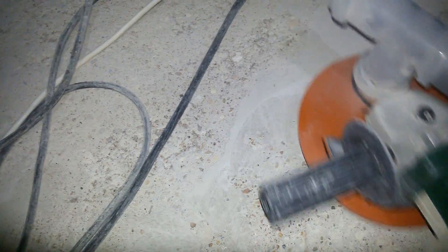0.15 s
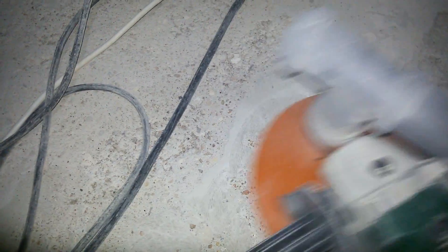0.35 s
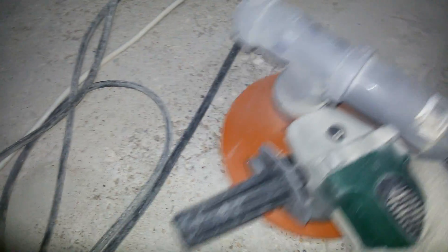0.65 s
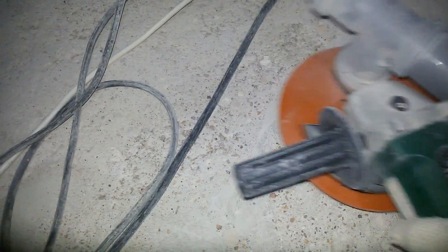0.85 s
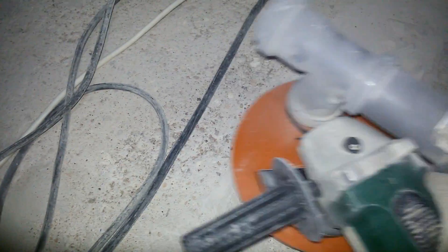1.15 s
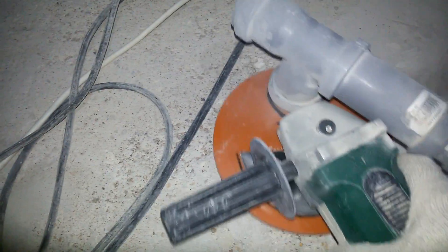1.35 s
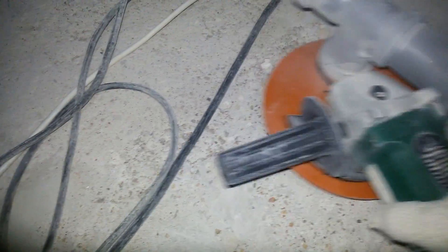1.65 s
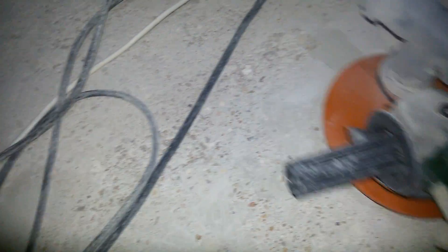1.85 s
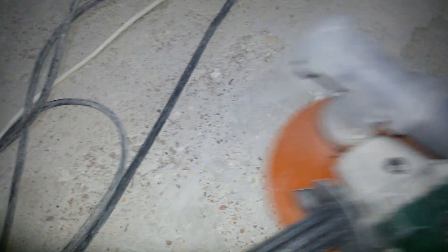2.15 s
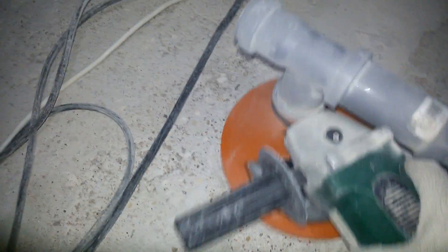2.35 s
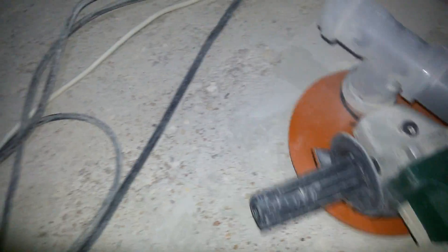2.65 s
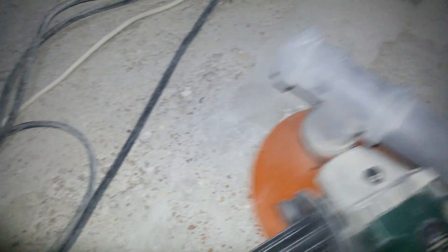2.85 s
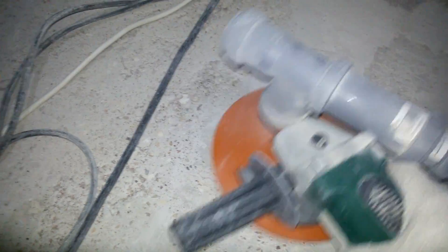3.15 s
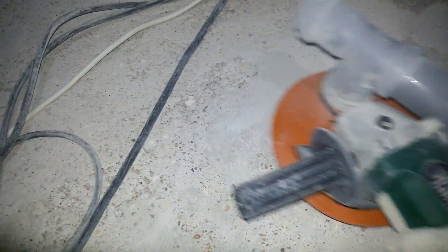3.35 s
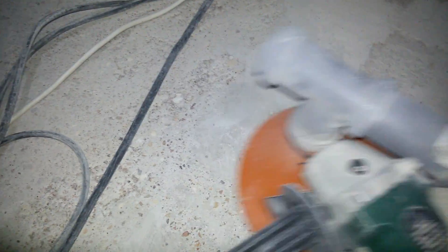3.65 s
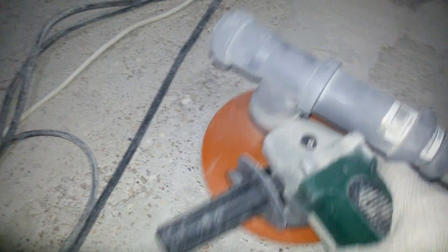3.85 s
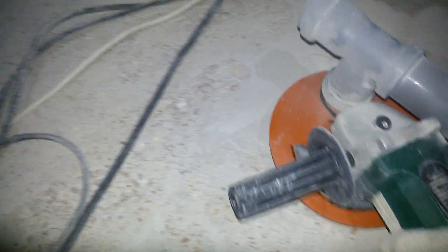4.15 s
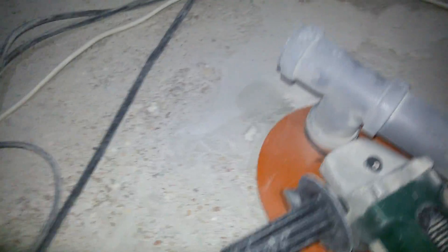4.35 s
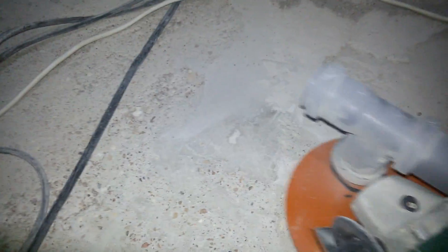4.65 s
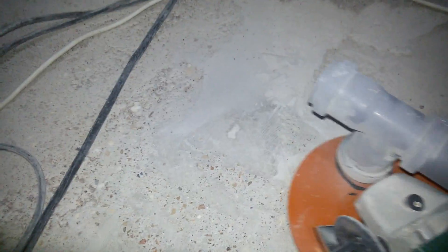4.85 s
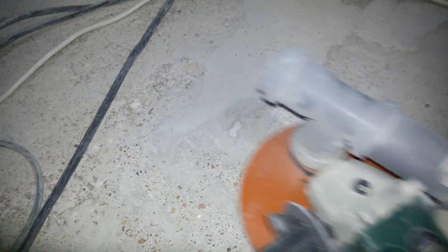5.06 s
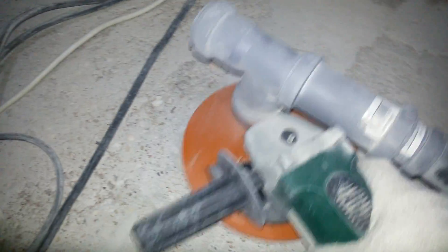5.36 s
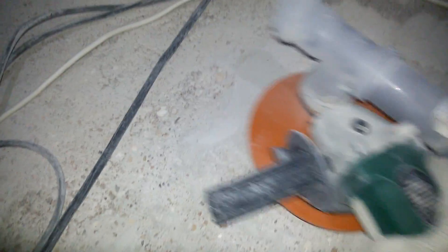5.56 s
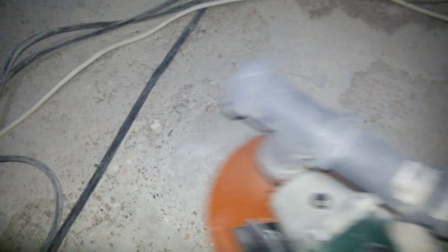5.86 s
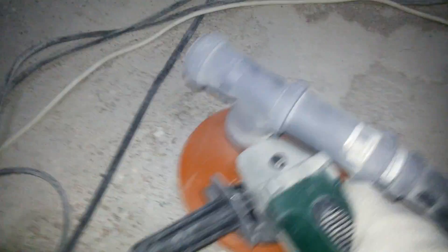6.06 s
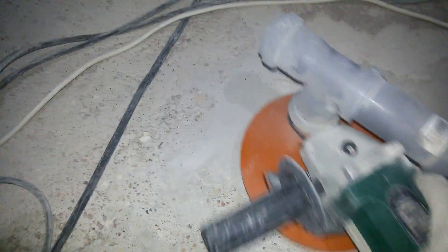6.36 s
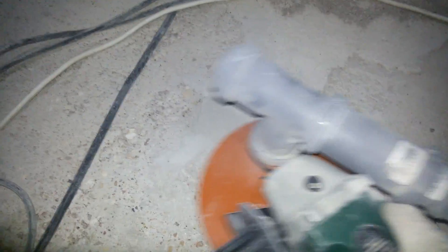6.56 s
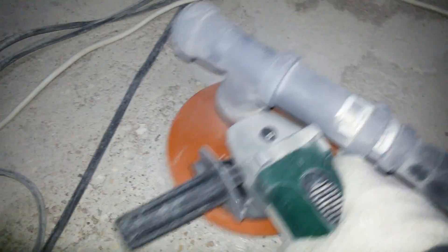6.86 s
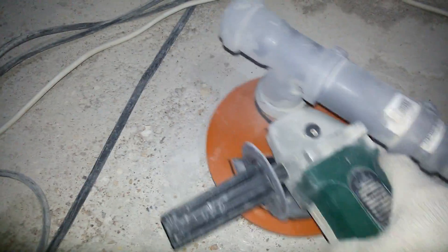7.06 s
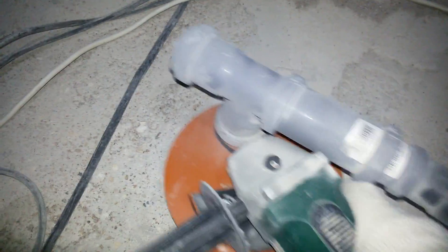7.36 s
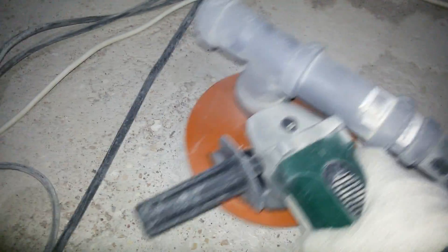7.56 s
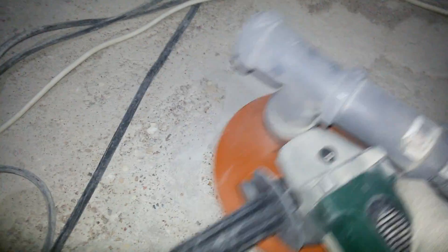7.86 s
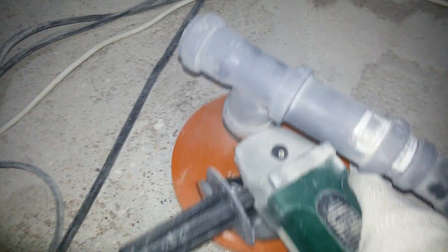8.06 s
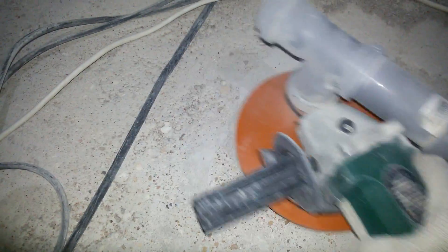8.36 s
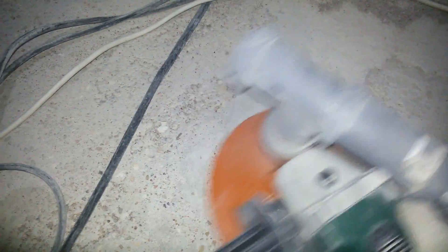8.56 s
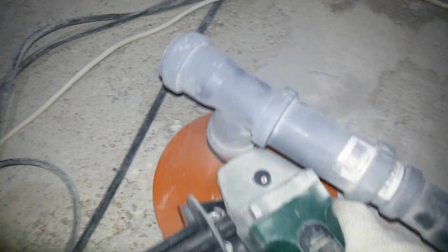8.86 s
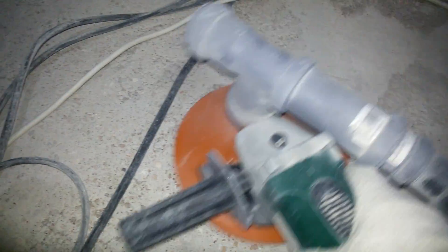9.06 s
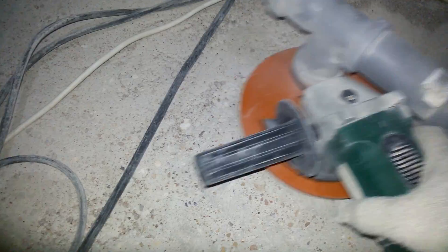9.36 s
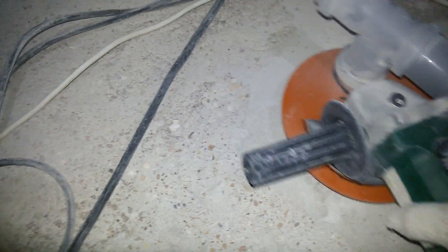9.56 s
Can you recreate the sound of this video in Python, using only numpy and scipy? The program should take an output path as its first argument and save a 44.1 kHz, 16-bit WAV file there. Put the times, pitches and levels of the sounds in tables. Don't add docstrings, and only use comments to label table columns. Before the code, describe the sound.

An angle grinder is already running at full tilt, grinding a concrete floor in sweeps. Its high gear whine dips and rises slightly with hand pressure, roughened by a fast electrical buzz. Grit rattles in the shroud, the cup wheel hisses and rings in short metallic flashes. A dust extractor whines steadily behind. Close single microphone indoors, loud, slightly overloaded, thin in the bass, never stopping.

```python
import sys
import numpy as np
from scipy import signal
from scipy.fft import rfft, irfft, next_fast_len
from scipy.io import wavfile
from scipy.ndimage import uniform_filter1d

SR = 44100
rng = np.random.default_rng(int(sys.argv[2]) if len(sys.argv) > 2 else 0)


def boost_factor(decibels):
    exponent = np.asarray(decibels, float) / 20
    return 10 ** exponent


def wav_out(sig):
    wavfile.write(sys.argv[1], SR, np.round(np.clip(np.atleast_2d(sig).T, -1, 1) * 32767).astype(np.int16))


N = 428652
TIME = np.arange(N) / SR

RIPPLE_HZ = 100.04
PINION, CROWN = 11, 34
FREE_TURNS, LOADED_TURNS = 368, 335
MESH_REST_DB = -20
HISS_DB, HISS_FREE_DB, TOP_DB = -17.5, 2.5, -36.5
TRACK_SHARE = .3
HOP, MEMORY_TOP_HZ = 941, 14460

# time in seconds, armature turns per second.
SPEED = [(0.0, 320.6), (0.19, 319.7), (0.93, 330.8), (2.22, 325.6), (2.96, 329.7), (3.85, 319.3),
         (4.52, 323.4), (5.28, 349.4), (6.04, 331.1), (6.84, 324.9), (7.31, 321.4), (8.08, 322.7),
         (8.52, 324.7), (9.72, 324.5)]
# centre in seconds, half length in seconds, turns per second gained.
EASINGS = [(0.63, 0.15, 4.9), (1.35, 0.19, 8.6), (1.69, 0.15, 5.8), (2.59, 0.21, 9.3), (3.4, 0.22, 11.8),
           (3.71, 0.13, 4.8), (4.13, 0.22, 12.1), (5.1, 0.33, 22.5), (5.61, 0.15, 15.0), (5.87, 0.14, 8.6),
           (6.29, 0.26, 13.8), (6.98, 0.11, 4.3), (7.5, 0.07, 1.4), (7.7, 0.09, 2.2), (8.11, 0.09, 3.1),
           (8.33, 0.2, 5.9), (8.85, 0.18, 8.7), (9.29, 0.25, 6.1)]
# centre in seconds, half length in seconds, turns per second.
TREMORS = [(0.17, 0.06, -0.4), (0.37, 0.06, 0.5), (1.35, 0.04, 0.3), (1.64, 0.2, 0.2), (2.33, 0.06, -0.4),
           (2.53, 0.06, 0.4), (3.27, 0.06, 0.7), (3.72, 0.14, -0.5), (4.0, 0.09, 0.5), (4.21, 0.06, 0.4),
           (4.37, 0.09, -0.7), (4.57, 0.04, -0.3), (4.86, 0.14, 0.5), (5.19, 0.06, 1.0), (5.39, 0.09, -0.5),
           (5.59, 0.06, -0.2), (5.72, 0.06, 0.3), (5.8, 0.3, -0.4), (6.04, 0.09, -0.4), (6.25, 0.06, 0.5),
           (6.45, 0.09, -0.5), (6.61, 0.06, 0.3), (6.78, 0.04, -0.8), (6.9, 0.04, 0.4), (8.08, 0.06, 0.5),
           (8.25, 0.04, -0.3), (8.66, 0.06, -0.2), (8.66, 0.3, 0.2), (9.15, 0.09, 0.2), (9.64, 0.14, -0.2)]
# armature turns per second, mesh overtone level in dB.
CASE = [(321.4, -28.5), (329.7, -33.5), (332, -34.5), (346.4, -35.5), (371, -28)]
# centre in seconds, half length in seconds, dB over rest.
SINGS = [(0.25, 0.17, 5), (0.94, 0.049, -18), (2.13, 0.22, 6), (2.53, 0.097, -15), (2.86, 0.12, 4.5),
         (3.1, 0.067, -18), (3.43, 0.06, 1), (3.68, 0.075, 6.5), (3.88, 0.096, 0), (4.21, 0.055, -10.0),
         (4.61, 0.22, 6), (4.98, 0.05, -8), (5.39, 0.087, 6), (5.68, 0.096, -2), (6.04, 0.049, -7.5),
         (6.53, 0.2, -1.5), (6.94, 0.1, 3.5), (6.22, 0.11, 4.5), (7.23, 0.077, -5), (7.51, 0.14, 4),
         (7.92, 0.066, -9.5), (8.08, 0.065, 4), (8.45, 0.06, -7), (8.64, 0.061, -7), (9.44, 0.09, -3),
         (9.15, 0.095, 2.5)]
# ripple beats away, wheel turns away, rest level in dB.
FRINGE = [(-3, 0, -35), (-1, -2, -37), (-2, 0, -27), (-1, -1, -31.5), (-1, 0, -24.8), (0, -1, -34),
          (0, 1, -35), (1, 0, -27), (2, 0, -29.5), (1, 1, -31), (3, 0, -35), (2, 1, -31), (3, 1, -33),
          (4, 1, -36)]
# centre in seconds, half length in seconds, change in dB.
TILT_FAR_BELOW = [(0.25, 0.057, 4.5), (1.06, 0.076, 8.5), (1.51, 0.12, -7), (1.96, 0.14, 2.5),
                  (2.74, 0.11, 5), (3.51, 0.23, 8), (4.0, 0.081, -13), (4.33, 0.16, 5), (4.57, 0.16, -10),
                  (4.66, 0.37, 12.5), (5.15, 0.09, -13), (5.39, 0.3, -12), (5.8, 0.09, 8.5),
                  (6.41, 0.044, 1), (6.94, 0.14, 8), (7.15, 0.051, -8), (7.35, 0.056, -2),
                  (7.59, 0.039, 11), (7.8, 0.09, -5), (8.13, 0.35, -0.5), (9.39, 0.021, 7),
                  (9.68, 0.053, 5)]
TILT_BELOW = [(0.37, 0.075, -6), (1.1, 0.27, 1), (1.72, 0.1, 6.5), (2.25, 0.075, -12.5), (2.7, 0.28, 6.5),
              (3.51, 0.27, 3.5), (3.8, 0.11, -12), (4.21, 0.081, 10), (4.41, 0.082, -14),
              (4.66, 0.082, 3.5), (4.9, 0.073, 3), (5.43, 0.09, -15), (6.17, 0.03, 0), (6.17, 0.37, -4),
              (6.29, 0.029, -6), (6.53, 0.14, 5.5), (6.98, 0.27, -1.5), (7.64, 0.21, -18),
              (8.17, 0.12, 4.5), (8.57, 0.064, -10), (8.7, 0.062, 6), (9.64, 0.083, -6)]
TILT_ABOVE = [(0.21, 0.24, 3), (0.7, 0.13, -4.5), (1.27, 0.29, -14.5), (1.88, 0.3, 3), (2.82, 0.082, -9),
              (4.41, 0.1, 6.5), (5.1, 0.092, 6), (5.43, 0.25, -15), (5.68, 0.16, 10), (5.96, 0.2, -7.5),
              (6.41, 0.064, -1), (6.86, 0.25, -15.5), (7.1, 0.16, 15), (7.47, 0.16, -9.5),
              (7.8, 0.083, 3.5), (8.21, 0.052, -7), (8.57, 0.1, 4), (8.82, 0.036, -9.0), (8.94, 0.036, 3),
              (8.98, 0.11, -17), (9.19, 0.04, -6), (9.55, 0.18, 7.5)]
TILT_FAR_ABOVE = [(0.7, 0.037, -9), (1.08, 0.2, -10.5), (1.43, 0.084, -6), (1.59, 0.17, 5),
                  (1.96, 0.094, -18), (2.25, 0.06, 7.5), (2.66, 0.055, -12), (2.86, 0.051, -22),
                  (3.27, 0.052, 3), (3.84, 0.065, -17), (4.0, 0.065, 4.5), (4.82, 0.38, -13),
                  (5.35, 0.19, 8), (5.88, 0.14, -19), (6.13, 0.075, 10.5), (6.29, 0.025, -8),
                  (6.66, 0.043, 0.5), (6.9, 0.16, 1), (7.27, 0.066, 2), (7.59, 0.085, 4), (8.21, 0.098, 9),
                  (8.41, 0.031, -5), (9.1, 0.29, 7.5)]
OVERTONE_FRINGE_DB = [-12, -7.5, -6, -5, -8, -8, -14]
# multiple of armature speed, level in dB, ripple sidebands relative in dB.
ORDERS_DB = [
    (1, -48.5, -20),
    (2, -49, -20),
    (10, -35, 0),
    (12, -30.5, -5),
    (15, -35, -8),
    (18, -37, -3),
    (21, -45, 1),
    (23, -42, -1),
    (33, -52, 0),
]
# frequency in Hz, density in dB per Hz.
RATTLE = [(310, -41.5), (520, -5.5), (533, -22.5), (553, -21), (608, -7.5), (927, 1.5), (1080, -7.5),
          (1400, 3.5), (1670, -7), (2150, -11.5), (2300, -14), (2990, -57), (5060, -120)]
# time in seconds, rattle level in dB.
LOOSE = [(0, -24), (1, -22.5), (2.1, -23.5), (4.5, -25), (4.9, -22), (5.2, -26), (5.55, -25), (5.8, -22),
         (6.15, -27), (6.8, -19), (7.1, -22.5), (7.6, -22.5), (8.2, -21), (8.85, -24.5), (9.3, -21),
         (9.72, -23)]
# centre in seconds, half length in seconds, change in dB.
BUMPS = [
    (.05, 0.073, 5.5),
    (1.0, 0.027, 3.5),
    (2.54, 0.086, 1),
    (4.55, 0.044, 4.5),
    (6.85, 0.099, -3.5),
]
# frequency in Hz, density in dB per Hz.
HISS = [(1180, -22), (2000, -15.5), (2160, -17.5), (2310, -14.5), (2490, -11), (3150, -5.5), (3650, -3),
        (4250, -3), (5390, -6), (5900, -12), (7590, -14.5), (8700, -32.5), (9400, -29), (12200, -53.5),
        (20700, -120)]
# centre in seconds, half length in seconds, hiss change in dB.
BITES = [(0.24, 0.089, -2.5), (.7, 0.076, 0), (1.05, 0.16, -1.5), (4.4, .12, 0), (11, 0.14, -1.5),
         (1.2, 0.26, 1.3), (2.06, 0.17, -0.5), (5.8, 0.11, 1.5), (7.7, 0.51, 0), (8.2, 0.58, 0.3),
         (4.9, 0.28, -0.5), (5.6, 0.13, 0.5), (6.7, .15, -1.5), (4.3, .15, -0.5)]
# upper edge in Hz, beat in dB, lag in radians, double beat in dB,
# change running free in dB.
RASP = [
    (2600, .9, -1.2, 0, 0),
    (3400, 3.2, 3.0, .6, 0),
    (4300, 1.6, 2.9, .6, 0),
    (4750, 2.3, .2, 2, 0),
    (5150, 1.6, -2, 1.9, 0),
    (6100, .9, -2.0, 0, -1.5),
    (7600, 2.2, -2.7, 1.4, -4),
    (22050, 1.8, -1.6, 1.5, 0),
]
# frequency in Hz, density in dB per Hz.
TOP = [(7000, -12), (8200, -1), (8800, -4), (9400, -11), (10700, -5), (12100, -7.5), (13300, -9),
       (13900, -13), (14500, -10.5)]
# frequency in Hz, width in Hz.
RING_MODES = [
    (2358, 30),
    (5540, 55),
    (6300, 39),
]
RING_REST_DB = [-41, -31, -39]
# centre in seconds, half length in seconds, rise in dB.
LOW_FLARES = [(0.09, 0.091, 5), (0.7, 0.33, 11), (1.03, 0.098, 5.7), (1.3, 0.28, 3.3), (1.75, 0.17, 6.1),
              (2.23, 0.089, 3.8), (2.51, 0.042, 11), (2.88, 0.14, 7.2), (3.27, 0.13, 5.2),
              (3.54, 0.044, 15), (3.91, 0.11, 3.5), (4.25, 0.061, 8.7), (4.47, 0.18, 10.4),
              (5.05, 0.27, 7.3), (5.8, 0.23, 13), (6.17, 0.025, 7.2), (6.34, 0.09, 4.9), (6.55, 0.079, 12),
              (7.18, 0.029, 6), (8.04, 0.073, 8), (9.03, 0.046, 6), (9.09, 0.2, 6.2)]
MIDDLE_FLARES = [(0.33, 0.031, 5), (0.531, 0.12, 14), (0.711, 0.021, 8.6), (1.32, 0.2, 9.5),
                 (1.82, 0.059, 5.6), (2.07, 0.033, 6.9), (2.23, 0.2, 6.4), (2.43, 0.02, 8),
                 (2.83, 0.016, 11), (3.11, 0.075, 14.3), (3.62, 0.048, 3.3), (3.84, 0.024, 14),
                 (4.36, 0.028, 6.6), (4.54, 0.14, 12), (4.77, 0.032, 4.7), (4.96, 0.022, 3.3),
                 (5.19, 0.15, 3), (5.81, 0.015, 7), (6.0, 0.13, 3.4), (6.04, 0.023, 6.6), (6.28, 0.026, 11),
                 (6.62, 0.065, 11), (6.81, 0.073, 3.4), (7.38, 0.17, 9.8), (8.01, 0.04, 6),
                 (8.23, 0.17, 1.8), (8.76, 0.028, 5.5), (9.15, 0.049, 3.8)]
HIGH_FLARES = [(0.31, 0.027, 9.2), (0.48, 0.24, 5.8), (1.07, 0.061, 11), (1.74, 0.04, 4), (2.0, 0.018, 4),
               (2.3, 0.025, 6.3), (2.37, 0.24, 2.7), (2.53, 0.025, 5), (2.97, 0.021, 4.2),
               (3.13, 0.22, 6.8), (3.47, 0.04, 4), (3.88, 0.028, 6.9), (4.62, 0.09, 4), (4.83, 0.11, 3.9),
               (6.04, 0.037, 7.3), (6.35, 0.16, 4.7), (6.98, 0.022, 5.6), (7.57, 0.14, 5.6),
               (8.289, 0.058, 13), (9.1, 0.13, 8.8)]
# centre in seconds, half length in seconds, change in dB.
CASE_HUMS = [
    (4.92, 0.28, 10.5),
    (2.05, 0.13, 4),
    (8.08, 0.068, 5.5),
    (2.4, 0.25, 6.5),
    (6, 0.13, -2.5),
]
# centre in seconds, half length in seconds, change in dB.
HOPS = [(.769, .005, -4), (2.57, 0.006, -4), (3.78, .01, -4.5), (4.428, .005, -5), (4.627, .005, -4),
        (4.846, 0.005, -3), (5.253, 0.004, -3), (5.32, 0.006, -10), (5.378, .004, -2.5), (5.45, 0.008, -3),
        (5.568, 0.006, -6), (5.924, 0.005, -6), (6.33, 0.008, -2.5), (6.677, .005, -4), (8.107, .004, -5),
        (8.125, .004, -4), (8.156, .003, -4), (9.617, .005, -4)]
# time in seconds, rotor turns per second.
ROTOR = [(0, 498.8), (1.5, 499.3), (4.7, 499), (5.6, 500.5), (7.3, 498.8), (9.72, 499.3)]
# time in seconds, level in dB.
ROTOR_DB = [(0.0, -33), (1.78, -27.5), (1.95, -31.5), (2.43, -28.5), (3.71, -29.5), (4.14, -28.5),
            (4.52, -33), (5.55, -27.5), (9.04, -28.5), (9.12, -26), (9.67, -28), (9.72, -36.5)]
# centre in seconds, half length in seconds, rise in dB.
BLADES_CLEAR = [
    (1.15, .45, 9),
    (1.85, .3, 5),
    (3.9, .55, 6.5),
    (5.5, .3, 8),
    (6.1, .4, 9.5),
    (7.1, .2, 7),
    (8.1, .5, 5),
]
# frequency in Hz, density in dB per Hz.
ROAR = [(140, -43.5), (200, -5.5), (260, -3.5), (330, -0.5), (450, -4), (600, 2), (900, 2), (1500, 0)]
# frequency in Hz, rounding step over the usual line size in dB.
THRIFT = [(150, 19), (200, 14), (255, 8), (300, 0), (500, -2), (2000, -2), (7000, -4), (8500, 3),
          (9400, 11), (10500, 9), (12000, 10), (12950, 11.5), (13250, 10), (13600, 14.5), (14400, 13.5)]


def rms_one(x):
    return x / np.sqrt(np.mean(x ** 2) + 1e-20)


def in_time(rows):
    s, *columns = np.transpose(rows)
    return [np.interp(TIME, s, c) for c in columns]


def swells(rows):
    coarse = TIME[::64]
    total = sum(height * np.exp(-((coarse - s) / half) ** 2) for s, half, height in rows)
    return np.interp(TIME, coarse, total)


def drift(rate):
    r = np.exp(-2 * np.pi * rate * 40 / SR)
    noise = rng.standard_normal(N // 40 + 2002)
    slow = signal.lfilter([1], [1, -2 * r, r * r], noise)[2000:]
    return np.interp(np.arange(N) / 40, np.arange(len(slow)), rms_one(slow - slow.mean()))


def tone(phase, level_db, fade_db, wander):
    level = boost_factor(level_db + fade_db * drift(7.8))
    return np.sqrt(2) * level * np.sin(phase + wander * drift(7.8))


def coloured(x, points):
    size = next_fast_len(N)
    hz = np.maximum(np.arange(size // 2 + 1) * SR / size, 1)
    hz_at, level_db = np.transpose(points)
    gain = boost_factor(np.interp(np.log(hz), np.log(hz_at), level_db, left=-90, right=-90))
    return rms_one(irfft(rfft(x, size) * gain, size)[:N])


def patchy(points, patchy_db, rate, count):
    x = coloured(rng.standard_normal(N), points)
    edges = np.geomspace(points[0][0], points[-1][0], count + 1)
    spectrum, hz = rfft(x), np.arange(N // 2 + 1) * SR / N
    bands = (irfft(spectrum * ((hz >= a) & (hz < b)), N) for a, b in zip(edges, edges[1:]))
    return sum(band * boost_factor(patchy_db * drift(rate)) for band in bands)


def resonance(hz, width_hz):
    r = np.exp(-np.pi * width_hz / SR)
    poles = [1, -2 * r * np.cos(2 * np.pi * hz / SR), r * r]
    return rms_one(signal.lfilter([1, 0, -1], poles, rng.standard_normal(N)))


def gear(armature, ripple, spindle, overtone_db):
    mesh = PINION * armature + .4 * drift(5)
    out = tone(mesh, MESH_REST_DB + swells(SINGS), fade_db=.5, wander=.3)
    tilts = {-2: swells(TILT_FAR_BELOW), -1: swells(TILT_BELOW),
             1: swells(TILT_ABOVE), 2: swells(TILT_FAR_ABOVE)}
    for beats, turns, rest_db in FRINGE:
        away = beats + turns
        turned = 1.9 * (away in (-1, -3)) + (.6 - .3 * away) * (abs(away) == 2)
        loose = 1 + 2 * abs(turns)
        level_db = rest_db + tilts[np.clip(away, -2, 2)] * (1 if abs(away) < 3 else .6)
        phase = mesh + beats * ripple + turns * spindle + turned
        out += tone(phase, level_db, fade_db=.8 * loose, wander=.28 * loose)
    for beats, step_db in enumerate(OVERTONE_FRINGE_DB, -3):
        wobble = spindle - ripple if abs(beats) == 2 else 0
        phase = 2 * mesh + beats * (ripple + 2.7) + wobble * np.sign(beats)
        out += tone(phase, overtone_db + step_db + 1.5, fade_db=2.5, wander=.5)
    return out


def armature_orders(armature, ripple):
    out = 0
    for multiple, level_db, side_db in ORDERS_DB:
        beat = np.cos(ripple + 2 * drift(1)) + .7 * np.cos(2 * ripple + 2 * drift(1))
        pulse = 1 + boost_factor(side_db) * 2 * beat
        out = out + pulse * tone(multiple * armature, level_db, fade_db=2.2, wander=.4)
    return out


def spindle_hum(spindle, ripple):
    out = tone(spindle + ripple, -53.0, fade_db=1.0, wander=0.86)
    return out + tone(spindle + 3 * ripple, -50.5, fade_db=4.5, wander=.5)


def throb(load, ripple, spindle, mains_db, double_db, spindle_db, sum_db, lag):
    beat_db = mains_db * np.cos(ripple - lag) + double_db * np.cos(2 * (ripple - lag))
    beat_db += spindle_db * np.cos(spindle) + sum_db * np.cos(spindle + ripple - lag)
    gain = boost_factor(load * boost_factor(.8 * drift(3.5)) * beat_db)
    return gain / np.sqrt(uniform_filter1d(gain ** 2, size=4410))


def backlash(knocks):
    count = int(2 * RIPPLE_HZ * N / SR)
    late, sign, size = rng.standard_normal((count, 3)).T
    at = ((np.arange(count) + .2) / (2 * RIPPLE_HZ) + .0004 * late) * SR
    at = np.clip(at.astype(int), 0, N - 1)
    clicks = np.zeros(N)
    clicks[at] = np.sign(sign) * knocks[at] ** .9 * boost_factor(.6 * size)
    return coloured(clicks, RATTLE)


def wheel_track(spindle):
    turn = spindle / (2 * np.pi)
    grit = rng.standard_normal((int(turn[-1]) + 22, 400))
    patterns = signal.lfilter([1], [1, -.85], grit, axis=0)[20:]
    return patterns[turn.astype(int), (turn % 1 * 400).astype(int)]


def rasping(hiss, load, ripple, spindle, patchy_db):
    spectrum, hz, low, out = rfft(hiss), np.arange(N // 2 + 1) * SR / N, 0, 0
    depth = load * boost_factor(.8 * drift(3.5))
    shared_db = .9 * np.cos(spindle) + 1.5 * np.cos(spindle + ripple - .6) + .6 * drift(60)
    double = np.cos(2 * ripple - .8)
    for high, beat_db, lag, double_db, free_db in RASP:
        beat = depth * (beat_db * np.cos(ripple - lag) + double_db * double + shared_db)
        beat = beat + free_db * (1 - load)
        band = irfft(spectrum * ((hz >= low) & (hz < high)), N)
        out = out + band * boost_factor(beat + patchy_db * drift(19))
        low = high
    return out


def band_pass(x, low_hz, high_hz):
    return signal.sosfiltfilt(signal.butter(2, [low_hz, high_hz], "band", fs=SR, output="sos"), x)


def contact(load, ripple, spindle):
    bumps_db = swells(BUMPS)
    rattle_db, top_db = in_time(LOOSE)[0] + bumps_db, TOP_DB + 0.43 * bumps_db
    hiss_db = HISS_DB + HISS_FREE_DB * (1 - load) + swells(BITES)
    knocks = throb(load, ripple, spindle, 4.8, 1.2, 2.4, 1.2, lag=.55)
    rasp = throb(load, ripple, spindle, .8, 1.1, .8, 1.2, lag=-.2)
    shake = drift(12)

    rattle = patchy(RATTLE, patchy_db=0.3, rate=7, count=4) * knocks ** .65
    rattle = (.74 * rattle + .66 * backlash(knocks)) * boost_factor(1.25 * shake)

    repeated = np.sqrt(TRACK_SHARE) * rms_one(wheel_track(spindle))
    grit = repeated + np.sqrt(1 - TRACK_SHARE) * rng.standard_normal(N)
    hiss = coloured(grit, HISS) * boost_factor(0.61 * shake)
    hiss = rasping(hiss, load, ripple, spindle, patchy_db=.7)
    hiss = hiss - .62 * (1 - load) * band_pass(hiss, 2300, 3450)

    top = patchy(TOP, patchy_db=0.94, rate=9.5, count=3) * rasp
    top = top + 0.8 * (1 - load) * band_pass(top, 11400, 13200)
    return boost_factor(rattle_db - 0.7) * rattle + boost_factor(hiss_db + 4.0) * hiss + boost_factor(top_db + 7.5) * top


def wheel(ripple):
    out = boost_factor(-27.5) * resonance(3530, width_hz=77) * boost_factor(2.0 * drift(3) + swells(CASE_HUMS))
    all_flares = (LOW_FLARES, MIDDLE_FLARES, HIGH_FLARES)
    for (hz, width_hz), rest_db, flares in zip(RING_MODES, RING_REST_DB, all_flares):
        ring = resonance(hz, width_hz)
        ring = ring / uniform_filter1d(ring ** 2, size=1200) ** .4
        level_db = rest_db + 1.2 * swells(flares) + 1.5 * np.cos(ripple + 1.4) + 1.5 * drift(25)
        out = out + boost_factor(level_db) * ring
    return out


def extractor():
    rotor = 2 * np.pi * np.cumsum(in_time(ROTOR)[0]) / SR
    level_db, = in_time(ROTOR_DB)
    out = tone(rotor, level_db - .2, fade_db=.9, wander=.05)
    out += tone(2 * rotor, -44, fade_db=3.0, wander=.3)
    out += tone(12 * rotor, -39.5 + swells(BLADES_CLEAR), fade_db=.7, wander=.3)
    return out + boost_factor(-30.0) * patchy(ROAR, patchy_db=1.5, rate=7.6, count=4)


def scene():
    turns = in_time(SPEED)[0] + swells(EASINGS) + swells(TREMORS)
    overtone_db = np.interp(turns, *np.transpose(CASE))
    armature = 2 * np.pi * np.cumsum(turns) / SR
    spindle = armature * PINION / CROWN
    ripple = 2 * np.pi * RIPPLE_HZ * TIME
    load = np.clip((FREE_TURNS - turns) / (FREE_TURNS - LOADED_TURNS), .2, 1)
    grinder = gear(armature, ripple, spindle, overtone_db) + armature_orders(armature, ripple)
    grinder = grinder + spindle_hum(spindle, ripple) + contact(load, ripple, spindle) + wheel(ripple)
    mono = grinder * boost_factor(swells(HOPS)) + extractor()
    return np.array([mono, mono])


def coarse_memory(x):
    n, k = np.arange(2 * HOP)[:, None] + .5, np.arange(HOP) + .5
    window = np.sin(np.pi * n / (2 * HOP))
    basis = np.sqrt(2 / HOP) * window * np.cos(np.pi / HOP * (n + HOP / 2) * k)
    basis = basis.astype(np.float32)
    frames = np.pad(x.astype(np.float32), (HOP, 2 * HOP - N % HOP)).reshape(-1, HOP)
    lines = np.hstack([frames[:-1], frames[1:]]) @ basis
    hz = k * SR / (2 * HOP)
    log_size = uniform_filter1d(np.log(np.abs(lines) + 1e-7), size=9)
    usual = 1.9 * np.exp(uniform_filter1d(log_size, size=9, axis=0))
    power = uniform_filter1d(uniform_filter1d(lines ** 2, size=41), size=3, axis=0)
    broad = np.sqrt(power + 1e-12)
    broad = np.sqrt(broad * broad.mean(axis=0))
    usual = np.where(hz < 3000, usual, broad)
    lasting = rng.standard_normal(HOP // 6 + 1)
    passing = rng.standard_normal((len(lines), HOP // 24 + 1))
    passing = np.repeat(uniform_filter1d(passing, size=4, axis=0), 24, axis=1)[:, :HOP]
    budget_db = .8 * np.repeat(lasting, 6)[:HOP] + 2.4 * passing
    thrift_hz, thrift_db = np.transpose(THRIFT)
    step = usual * boost_factor(np.interp(np.log(hz), np.log(thrift_hz), thrift_db) + budget_db)
    rounded = np.floor(np.abs(lines) / step + .4) * step
    lines = np.sign(lines) * rounded * (hz < MEMORY_TOP_HZ)
    halves = lines.astype(np.float32) @ basis.T
    return (halves[:-1, HOP:] + halves[1:, :HOP]).ravel()[:N].astype(float)


def low_pass(x):
    return signal.sosfilt(signal.butter(12, 15700, fs=SR, output="sos"), x)


def record(dry):
    overloaded = np.clip(dry[0], -.91, .91)
    bass_cut = signal.sosfilt(signal.butter(6, 165, "high", fs=SR, output="sos"), overloaded)
    mono = np.clip(coarse_memory(bass_cut), -1, 1)
    return low_pass(np.array([mono, mono]))


dry = scene()
out = record(dry)
wav_out(out)
```